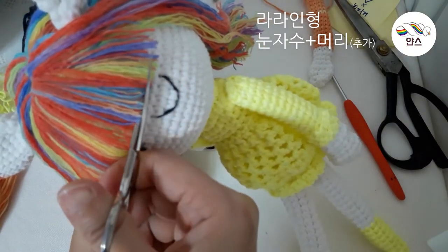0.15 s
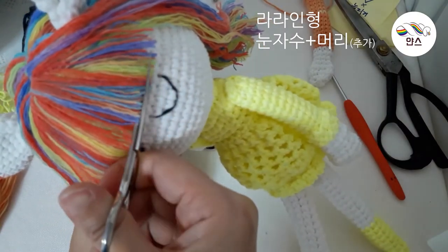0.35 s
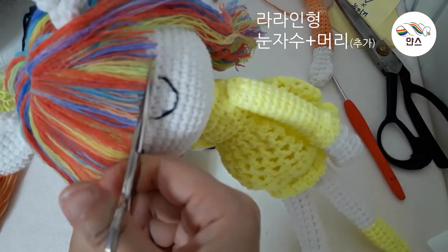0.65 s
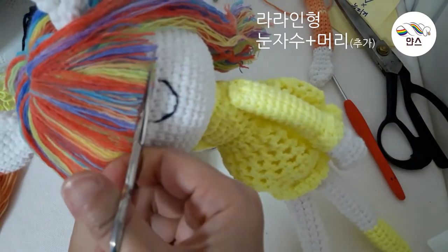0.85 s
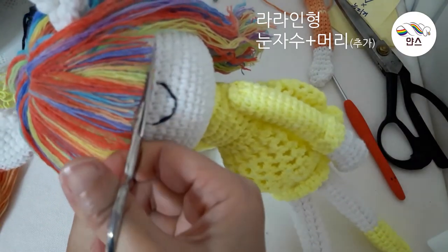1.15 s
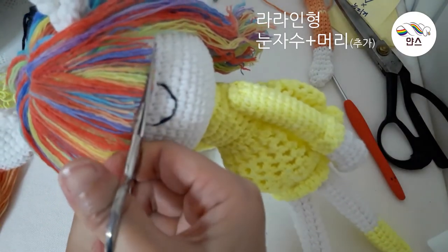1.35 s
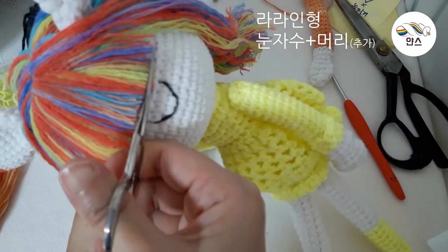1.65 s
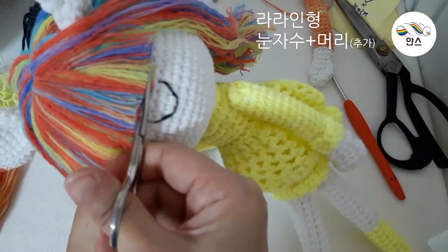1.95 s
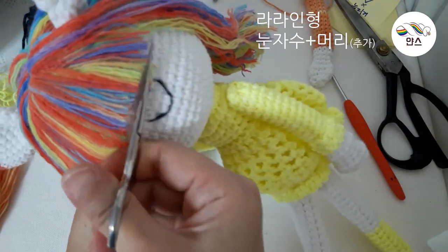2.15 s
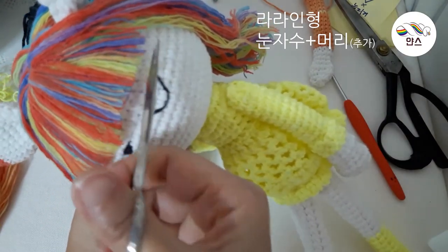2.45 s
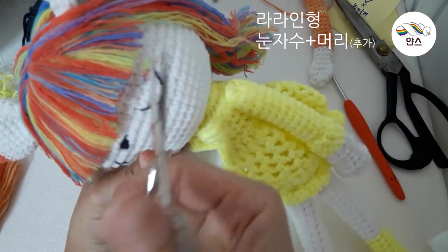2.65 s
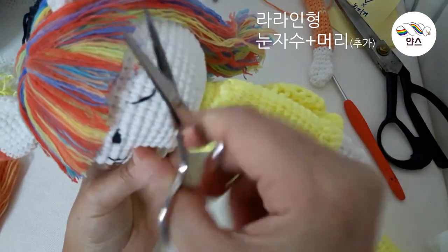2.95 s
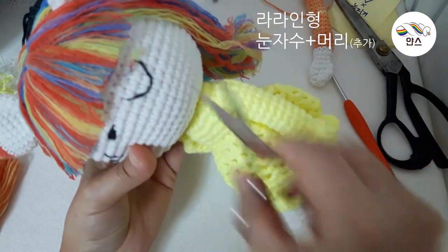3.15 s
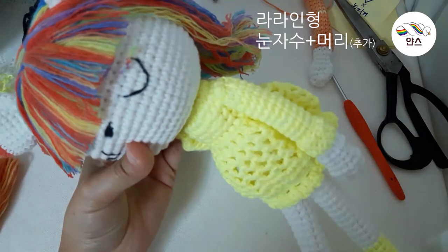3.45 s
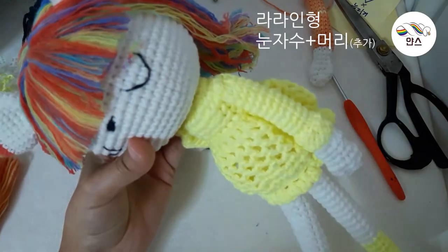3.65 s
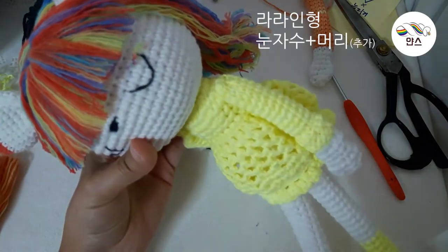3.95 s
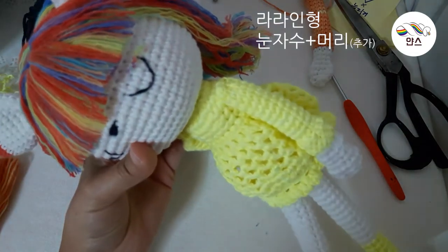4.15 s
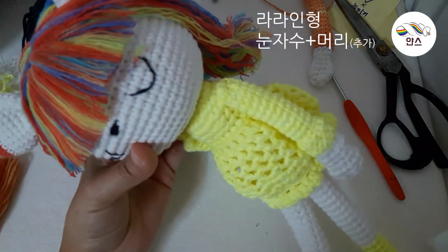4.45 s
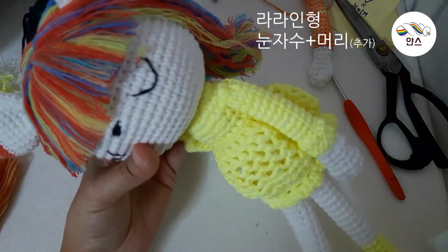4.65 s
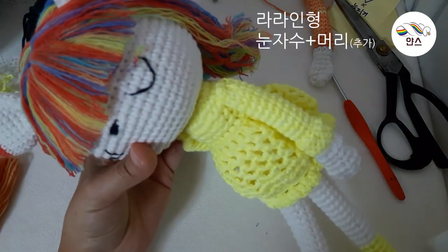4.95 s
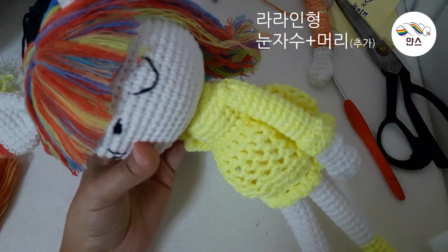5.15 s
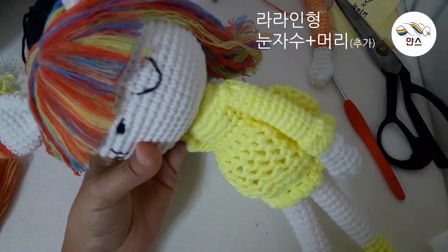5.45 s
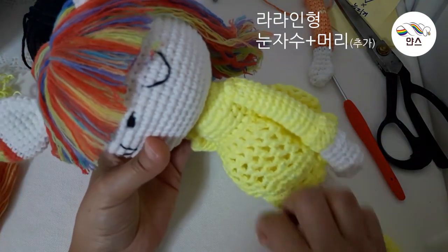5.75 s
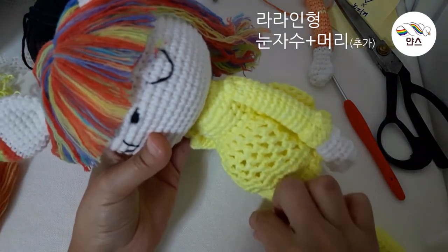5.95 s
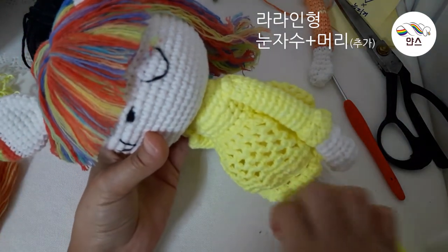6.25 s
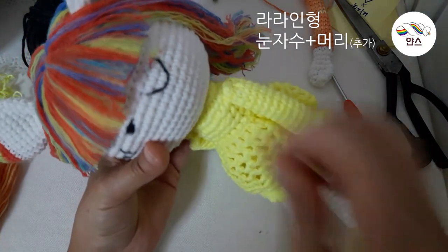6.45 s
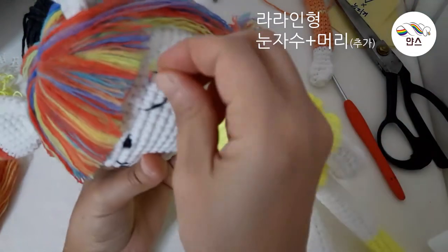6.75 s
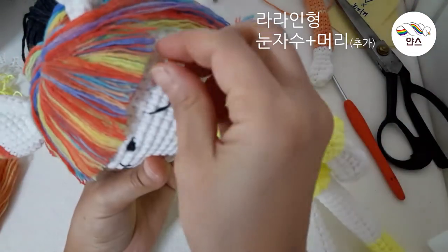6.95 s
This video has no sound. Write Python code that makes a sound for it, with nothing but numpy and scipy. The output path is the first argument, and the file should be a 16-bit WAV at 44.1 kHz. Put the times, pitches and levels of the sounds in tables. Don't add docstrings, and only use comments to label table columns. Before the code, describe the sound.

Close phone microphone, indoors. Fibres snap in a swelling, gritty cut, then a quick second cut ends with a tiny steel snap. After near silence, the blades click, touch the table with a small jingle and thud, then fall with a sharp bright clack and bounce. Hands brush knitted wool and gently knock the table over soft hiss and traffic rumble.

```python
import sys
import numpy as np
from scipy import signal
from scipy.fft import rfft, irfft
from scipy.io import wavfile
from scipy.ndimage import uniform_filter1d

SR = 44100
rng = np.random.default_rng(int(sys.argv[2]) if len(sys.argv) > 2 else 0)


def generate_wav(signal):
    frames = np.transpose(np.atleast_2d(signal))
    scaled = np.clip(frames, -1, 1) * 32767
    pcm = np.round(scaled).astype(np.int16)
    wavfile.write(sys.argv[1], SR, pcm)


def voltage_ratio(decibels):
    exponent = np.asarray(decibels, float) / 20
    return 10 ** exponent


N = 313551
STEADY_TOP_HZ = 15880

# frequency in Hz, density in dB per Hz.
AIR_COLOUR = [(35, -43), (60, -7), (107, 0.5), (129, -2.5), (160, -2), (192, -6), (226, -10.5),
              (466, -14.5), (500, -14.5), (631, -15.5), (1530, -20.5), (1680, -20), (8180, -38.5),
              (12200, -32), (15700, -30.5)]
# frequency in Hz, side minus mid in dB.
PORT_SIDE_DB = [(60, -25), (110, -31), (200, -15), (380, -9.5), (700, -7.5), (1290, -5.5), (2380, -5),
                (4400, -2.5), (8120, -2.5), (15000, -3.5)]
# loudest time in seconds, level in dB.
RUMBLE_SWELLS = [(.01, -58), (.65, -65.5), (.92, -65.5), (1.3, -76), (1.62, -66), (2.199, -63.5),
                 (2.75, -65), (4.19, -68.5), (4.6, -72.5), (5.0, -69), (6.0, -71), (7.0, -65)]
# loudest time in seconds, level in dB, rise and fall in seconds over 20 dB.
DRONE_SWELLS = [(.3, -76, 2.5, 3.8), (2.7, -60.5, 0.43, 0.44), (3.25, -68, 0.4, 0.94),
                (6.3, -65.5, 2.2, 1.3)]
# centre in Hz, width in Hz.
RUMBLE_BAND_HZ = (45.6, 18)
DRONE_BAND_HZ = (66, 20)

# centre in seconds, level in dB, width in seconds.
STRAND_BREAKS = [
    [(.099, -68, .004), (.1156, -68, 0.0094), (.15, -83, 0.011), (.1643, -81, .012), (.1762, -74, .014),
     (.192, -65, .0085), (.1991, -68, 0.006), (.2084, -65, .004), (.221, -66, .013), (.248, -61.5, 0.0076),
     (.2744, -57, 0.0021), (.29, -64, 0.0074), (.31, -55, 0.0077), (.3237, -57, 0.0026),
     (.3456, -56, 0.008), (.3611, -53, 0.0076), (.3708, -56, 0.0053), (.3805, -53.5, 0.0092),
     (.392, -70, .005), (.401, -71, 0.0046), (.414, -47.5, 0.01), (.4258, -63, 0.0096)],
    [(1.782, -61, .007), (1.79, -63, 0.0057), (1.772, -64, .002), (1.806, -58, .004), (1.811, -61, .007),
     (1.8205, -61, 0.004), (1.825, -63, .004), (1.831, -64, .005), (1.8594, -48.5, 0.012),
     (1.878, -59, .006), (1.8832, -48, .006), (1.888, -53, 0.0057), (1.8925, -54, .005),
     (1.899, -68, 0.0037)],
    [(2.1315, -59, 0.0025), (2.1376, -73, 0.0072), (2.149, -66.5, 0.035)],
]
TIPS_CUT_S = [.215, 1.84, 2.2]
# time in seconds, level in dB.
BLADE_SLIDE = [
    [(.02, -81), (.08, -75), (.15, -71), (.17, -64.5), (.24, -65), (.3, -66.5), (.39, -73), (.4, -95),
     (.43, -67), (.447, -78)],
    [(1.75, -77), (1.78, -72), (1.835, -64), (1.845, -75), (1.87, -66), (1.895, -62), (1.908, -77)],
]
# frequency in Hz, width in Hz, level in dB.
BLADE_BANDS = [(1360, 230, 0), (1770, 360, 7.5), (2570, 270, 6), (3650, 550, -20), (4660, 760, 6.5),
               (5940, 830, 0.5), (7460, 640, 7.5), (9630, 680, 7), (12500, 900, 1)]
# frequency in Hz, density in dB per Hz.
FIBRE_COLOUR = [(410, -51), (700, -37), (1600, -1.5), (2460, 10.5), (2880, -20), (3610, 4), (9850, -12.5),
                (11100, -4.5), (15200, -2), (16500, -44)]

# time in seconds, level in dB, T60 in seconds.
STEEL_ON_STEEL_TICKS = [(.452, -40, 0.014), (3.7634, -39, .012), (4.5095, -39.5, 0.044), (4.525, -45, .02),
                        (4.61, -56.5, .03), (4.925, -63, .01), (5.197, -55.5, .014), (5.262, -60, 0.011),
                        (5.302, -43.5, 0.022), (5.323, -48, 0.027), (5.404, -30.5, 0.046),
                        (5.409, -34, .05), (5.4988, -45, .02), (5.503, -48, .025), (5.508, -52, .03)]
HANDLE_TICKS = [(1.9137, -45, .01), (5.3802, -34.5, 0.055), (4.5072, -45, .004), (4.512, -46, .02),
                (4.5216, -41, 0.013), (4.525, -40, 0.02), (4.563, -52, .025), (4.611, -53, 0.033),
                (4.617, -55, .015), (4.847, -55, 0.0062), (4.86, -60, .015), (4.932, -58, .01),
                (4.979, -61, .02), (5.125, -63, .01), (5.197, -58, 0.013), (5.2656, -55, 0.0095),
                (5.957, -55, .02)]
BLADE_TIP_TICKS = [(3.743, -59, 0.012), (3.762, -46, 0.0067), (4.511, -46, 0.035), (4.5215, -52, .015),
                   (4.525, -44, .03), (4.534, -51, .015), (4.5385, -48, .02), (4.611, -52, .03),
                   (5.308, -57, .03), (5.3803, -25, 0.028), (5.3825, -34, .04)]
PIVOT_TICKS = [(1.853, -49, .04), (1.858, -50, 0.037), (1.882, -55, 0.043), (0.56, -61, 0.03),
               (.5655, -53, .03), (.582, -63, .05)]
LATCH_TICKS = [(.0803, -68, .02), (.0962, -63, .03), (.108, -67, .04), (.1341, -65, .02), (.1576, -62, .04),
               (.172, -61, .04), (.1885, -57, .03), (.392, -66, .04), (3.763, -55, .06), (3.777, -57, .03),
               (3.782, -61, .02), (3.787, -62, .03), (4.924, -64, .02), (4.942, -63, .02)]
NAIL_TICKS = [(4.511, -48.5, 0.04), (5.3793, -41.5, 0.059), (5.795, -54, 0.024), (6.022, -61, 0.022),
              (6.0483, -50, 0.019)]
KNUCKLE_TICKS = [(4.511, -49.5, 0.041), (4.525, -46, 0.093), (5.379, -56, .04), (6.048, -49, 0.08)]
FLAT_SIDE_TICKS = [(5.957, -57.5, .02), (5.5, -60, 0.024), (5.377, -37, 0.045), (5.408, -44, 0.068),
                   (4.511, -50, .03), (4.5255, -48, .04), (6.0485, -46, .025)]
FIBRE_TICKS = [(.3605, -55, .015), (.378, -46, .025), (.409, -52, .04), (1.856, -58, .03),
               (1.879, -56, .04)]
RIVET_TICKS = [(4.9245, -58, .008), (4.9555, -45, .01), (4.617, -54, .02), (1.8065, -56, .012),
               (5.197, -55, .01), (.412, -52, .03), (.3095, -56, .015), (5.41, -42, .08)]
FINGER_LOOP_TICKS = [(5.3769, -22, .02), (5.3793, -22, .03), (5.4045, -38, .06), (5.42, -48, .2),
                     (4.511, -54, .03)]
# frequency in Hz, width in Hz.
TICK_BANDS = [(7486, 20000), (3260, 2600), (12120, 2300), (1770, 280), (7500, 850), (1186, 400), (356, 260),
              (680, 720), (14580, 2600), (4060, 2000), (6500, 2400)]
SNAP_TIMES_S = [
    1.9136,
    3.7621,
    5.3768,
]
# peak in dB, T60 in seconds, first click over the rattle in dB.
SNAP_SHAPES = [(-32, 0.006, 17), (-33, 0.013, 12), (-11.5, 0.022, 9.07)]
# frequency in Hz, density in dB per Hz.
SNAP_SPECTRA = [
    [(290, -46), (600, -22), (900, -17), (1700, -14), (2650, 5), (3500, -10), (4700, 2.5), (6000, -14), (7400, -3.5), (9700, -19), (13100, -5), (16800, -27)],
    [(290, -55), (500, -32), (1300, -29), (2600, -7.5), (4000, -13), (5270, -29), (6600, -26), (7600, 0), (7950, 3), (8900, -7), (10200, -3), (12000, -16), (13700, -4), (15900, -8), (16800, -38.5)],
    [(180, -41.5), (550, -20.5), (1250, -20.5), (1950, -22.5), (2400, -8.5), (3280, -16.5), (4230, -18.5), (6550, -4.5), (7890, -10), (8300, -29), (9030, -16), (13800, -1.5), (16800, -31)],
]

# loudest time in seconds, level in dB, rise and fall in seconds over 20 dB.
BRUSH_STROKES = [(.564, -73, 0.033, 0.41), (.865, -76, .02, .15), (3.09, -76.5, 0.17, .02),
                 (3.904, -65, 0.03, 0.057), (4.105, -61, 0.016, 0.088), (4.15, -76.5, 0.075, 0.047),
                 (4.3, -73, 0.54, 0.48), (4.86, -61.5, 0.01, 0.095), (4.94, -68, 0.051, 0.023),
                 (4.985, -69.5, 0.047, 0.013), (5.16, -71.5, 0.33, 0.11), (5.28, -66.5, 0.11, 0.064),
                 (5.435, -58.5, 0.011, 0.013), (5.45, -68, .04, .05), (5.485, -70, 0.076, 0.016),
                 (5.798, -70, 0.027, 0.28), (5.958, -71.5, 0.018, 0.36), (6.1, -77, 0.29, 0.053),
                 (6.31, -73.5, 0.099, 0.24), (6.91, -71.5, 0.22, 0.014), (6.966, -76, 0.022, .06)]
# frequency in Hz, density in dB per Hz.
WOOL_COLOUR = [(710, -24.5), (1200, -2), (1870, -8), (3840, -2), (5610, -12.5), (7310, -7.5), (8570, -18.5),
               (15000, -13.5)]
# loudest time in seconds, level in dB, rise and fall in seconds over 20 dB.
DRAG_STROKES = [(6.255, -70, .1, 0.048), (6.3, -67, 0.047, 0.065), (6.372, -67, 0.072, 0.097)]
# frequency in Hz, width in Hz, level in dB.
DRAG_BANDS = [(480, 30, -1.5), (1120, 110, -8), (1690, 50, 0), (2273, 70, -4), (2830, 270, -9)]

# time in seconds, level in dB, free ringing in seconds,
# sharpening of all modes in percent, sharpening of the loose blade in Hz.
STEEL_TAPS = [
    (4.51, -44, .04, -0.032, 0),
    (4.5251, -41, .04, -0.028, 33),
    (4.5385, -40.5, 0.039, -0.072, 33),
    (4.6105, -43, 0.024, .22, 18),
    (5.307, -48.5, .018, -0.079, 44.5),
    (5.324, -52, 0.022, 0.16, 10.5),
    (5.378, -24.5, .042, -0.013, 4),
    (5.406, -34.5, .03, 0.074, 10.5),
]
MODE_DB = [(-10, -3, -9.5, -15.5, -21.5, -5.5, -25, -25), (-16, -14, -15, -18.5, -21, -13, -23, -22),
           (-21, -7.5, -7, -20, -4, -11, -17.5, -19.5), (-19, -2.5, -9.5, -14.5, -19, -7, -19.5, -17.5),
           (-25, -35, -37, -44, -29, -39, -25.5, -33), (-32, -34, -36, -51, -28.5, -38.5, -20, -16.5),
           (-8, -6, -6.5, -17.5, -17, -13, -15, -10), (-21, -12, -9, -30, -22.5, -27.5, -26.5, -24),
           (-23, -21, -37, -33, -23, -19, -13.5, -16), (-21, -1, -4.5, -14, -6.5, -4.5, -13, -21.5),
           (-6, -4, -2, -20, -18.5, -9, -15, -4), (-13, -5, -13, -15, -30, -26, -23.5, -13.5),
           (-23, -23, -30, -40, -37, -25.5, -11, -10.5), (-26, -24, -40, -36, -26.5, -23.5, -11, -7),
           (-18, -28, -35, -28, -23, -32.5, -18, -12), (-25, -25, -30, -35, -30, -30, -17, -20),
           (-13, -7, -3, -9, -24.5, 0, -2, -7.5), (-5, 1, 1, 0, -8.5, -17, -9, 0.5),
           (-13, -6, -10.5, -9, -3.5, -2, -10, -13.5), (-24, -20, -22, -17, -23.5, -36.5, -19, -14),
           (0, -2.5, -3, -13, -10.5, -13.5, -11, 0), (-14, -9, -8, -18, -19, -13.5, -16.5, -13),
           (-21, -11, -7.5, -25, -5, -7, -19.5, -18.5), (-22, -34, -32, -34, -31, -20.5, -25.5, -20.5)]
MODE_HZ = [1707, 3429, 5890, 6670, 7170, 7424, 8445, 9213, 9585, 9755, 10417, 10540, 11897, 11970, 12350,
           13030, 13425, 13496, 13528, 13760, 14125, 14301, 14525, 15130]
MODE_T60_S = [.07, .14, .12, .13, .06, .048, .17, .1, .08, .3, .11, .12, .07, .1, .06, .08, .09, .14, .1,
              .12, .12, .13, .12, .3]
LOOSE_MODE_HZ = [6670, 8445]
TIP_REST_DB = [-5, -5, -19, -5.5, -5, -13.5, -8, -13]
HAND_STOPS_S = [4.74, 5.503]

# time in seconds, peak in dB, upper modes in dB, push in seconds, free ringing in seconds.
TABLE_BUMPS = [(4.526, -42.5, -8, 0.0015, 0.044), (4.559, -46.5, -3, 0.0053, 0.08),
               (4.849, -40.5, -9.5, 0.011, 0.032), (5.378, -35.5, -7, 0.0025, 0.045),
               (5.41, -48, 0, 0.0055, 0.1), (5.958, -51, 1.5, 0.0065, 0.075),
               (5.986, -55.5, 10, 0.0081, 0.042), (6.012, -51.5, 8, 0.0045, 0.028),
               (6.0486, -53.5, 8.5, 0.00096, 0.034), (6.066, -53.5, 2.5, 0.003, 0.038),
               (6.118, -67.5, 10, 0.0031, 0.026)]
# frequency in Hz, level in dB, T60 in seconds.
TABLE_LOW_MODES = [(68.4, -18.5, 0.15), (106.7, -1, 0.48)]
TABLE_UPPER_MODES = [(164, 8, 0.081), (198.4, -3.5, 0.21), (271, 2, 0.056), (460, -7.5, 0.0355)]

# frequency in Hz, level in dB.
ECHO_COLOUR = [(300, 0.5), (1200, 0.5), (3500, -5), (7000, 0), (10000, -3.5), (14000, -7)]


def level(x, db):
    return x * voltage_ratio(db) / np.sqrt(np.mean(x ** 2))


def peak(x, db):
    return x * voltage_ratio(db) / np.abs(x).max()


def colour(x, points):
    hz, db = np.transpose(points)
    f = np.fft.rfftfreq(len(x), 1 / SR) + 1
    return irfft(rfft(x) * voltage_ratio(np.interp(np.log(f), np.log(hz), db)), len(x))


def strike(x, points):
    hz, db = np.transpose(points)
    f = np.fft.rfftfreq(1024, 1 / SR) + 1
    cepstrum = irfft(np.log(voltage_ratio(np.interp(np.log(f), np.log(hz), db))))
    folded = np.r_[cepstrum[0], 2 * cepstrum[1:512], np.zeros(512)]
    impulse = irfft(np.exp(rfft(folded)))
    return signal.fftconvolve(x, impulse)[:len(x)]


def band(x, hz, width_hz):
    return signal.lfilter(*signal.iirpeak(min(hz, SR / 2.2), hz / abs(width_hz), fs=SR), x)


def low_pass(x, hz):
    return irfft(rfft(x) * (np.fft.rfftfreq(N, 1 / SR) < hz), N)


def add(out, start_s, x):
    i = int(start_s * SR)
    out[i:i + len(x)] += x[:N - i]


def gain(spans, edge_s=0.013):
    t, g = np.arange(N) / SR, np.zeros(N)
    for rows in spans:
        s, db = np.transpose(rows)
        edges = np.clip(np.minimum(t - s[0], s[-1] - t) / edge_s, 0, 1)
        g += voltage_ratio(np.interp(t, s, db)) * edges
    return g


def swells(rows):
    t, g = np.arange(N) / SR, np.zeros(N)
    for top_s, db, rise_s, fall_s in rows:
        away = np.maximum((top_s - t) / rise_s, (t - top_s) / fall_s)
        g += voltage_ratio(db - 20 * away.clip(0, 9))
    return g


def flicker(rate_hz, db):
    k = int(SR / rate_hz)
    steps = np.repeat(rng.standard_normal(N // 20), k)[:N]
    return voltage_ratio(db * uniform_filter1d(steps, k))


def crackle(spread_db):
    return rng.standard_normal(N) * voltage_ratio(spread_db * rng.exponential(size=N).clip(0, 4))


def damped(t, free_s, t60_s, rest_db):
    return voltage_ratio(-60 * np.maximum(t - free_s, 0) / t60_s).clip(voltage_ratio(rest_db))


def ring(modes, lift_db, t, fall, phase):
    hz, db, t60_s = np.transpose(modes)[:, :, None]
    sines = np.sin(2 * np.pi * (hz * t + phase))
    return np.sum(voltage_ratio(db + lift_db - 60 * t / t60_s) * sines * fall, axis=0)


def air():
    mid, other = (level(colour(rng.standard_normal(N), AIR_COLOUR), -63.5) for _ in range(2))
    above = signal.sosfilt(signal.butter(6, 88, "high", fs=SR, output="sos"), mid)
    deep = rng.standard_normal(N)
    bands = RUMBLE_BAND_HZ, DRONE_BAND_HZ
    rumble, drone = (level(band(band(deep, *hz), *hz), 0) for hz in bands)
    rise_s, fall_s, bed_db = .25, .3, -75.5
    traffic = voltage_ratio(bed_db) + swells((s, db, rise_s, fall_s) for s, db in RUMBLE_SWELLS)
    side = voltage_ratio(-2.0) * colour(other, PORT_SIDE_DB)
    return above + rumble * traffic + drone * swells(DRONE_SWELLS), side


def snips():
    throat_treble_db, tip_treble_db = -18, -1
    snaps = crackle(3.5)
    body = sum(voltage_ratio(db) * band(snaps, hz, width) / np.sqrt(width) for hz, width, db in BLADE_BANDS)
    tone = level(colour(snaps, FIBRE_COLOUR), -0.89) + level(body, -6.0)
    low = signal.sosfilt(signal.butter(2, 8600, fs=SR, output="sos"), tone)
    dull, bright = np.zeros(N), np.zeros(N)
    for cut, tips_s in zip(STRAND_BREAKS, TIPS_CUT_S):
        for centre_s, db, width_s in cut:
            swell = np.hanning(int(1.53 * width_s * SR) + 9) * voltage_ratio(db)
            start_s = centre_s - len(swell) / SR / 2
            treble_db = tip_treble_db if centre_s > tips_s else throat_treble_db
            add(dull, start_s, swell)
            add(bright, start_s, swell * voltage_ratio(treble_db))
    slide = level(level(body, 0) + level(low, -1.9), 0) * gain(BLADE_SLIDE) * flicker(150, 3.9)
    return level(low, 0.2) * dull + level(tone - low, 0.93) * bright + slide


def ticks():
    out, t = np.zeros(N), np.arange(SR // 5) / SR
    touched = [STEEL_ON_STEEL_TICKS, HANDLE_TICKS, BLADE_TIP_TICKS, PIVOT_TICKS, LATCH_TICKS, NAIL_TICKS,
               KNUCKLE_TICKS, FLAT_SIDE_TICKS, FIBRE_TICKS, RIVET_TICKS, FINGER_LOOP_TICKS]
    first_click = 4.5
    for rows, (hz, width_hz) in zip(touched, TICK_BANDS):
        for s, db, t60_s in rows:
            noise = rng.standard_normal(len(t) - 1)
            rattle = np.r_[first_click, noise] * voltage_ratio(-60 * t / t60_s)
            add(out, s, peak(band(band(rattle, hz, width_hz), hz, width_hz), db + 3.0))
    out = low_pass(out, STEADY_TOP_HZ)
    for s, (db, t60_s, click_db), points in zip(SNAP_TIMES_S, SNAP_SHAPES, SNAP_SPECTRA):
        noise = rng.standard_normal(len(t) - 1)
        rattle = np.r_[voltage_ratio(click_db), noise] * voltage_ratio(-60 * t / t60_s)
        add(out, s, peak(strike(rattle, points), db))
    return out


def hands():
    brush = level(colour(crackle(2.0), WOOL_COLOUR), -0.44) * swells(BRUSH_STROKES) * flicker(60, 2.6)
    slips, scrape = crackle(3.7), np.zeros(N)
    for hz, width_hz, db in DRAG_BANDS:
        narrowed = band(band(slips, hz, 2.1 * width_hz), hz, 1.8 * width_hz)
        scrape += voltage_ratio(db) * level(narrowed, 0)
    return brush + level(scrape, 0) * swells(DRAG_STROKES) * flicker(50, 4)


def steel():
    held_t60_s, held_rest_db, struck_t60_s = .05, -26, .012
    tip_t60_s = .145
    waver_hz, waver_db = 13, 2.5
    out, t = np.zeros(N), np.arange(SR // 4) / SR
    t60_s = np.array(MODE_T60_S)
    stops = np.sort([row[0] for row in STEEL_TAPS] + list(HAND_STOPS_S))
    count = len(MODE_HZ)
    for tap, mode_db, tip_db in zip(STEEL_TAPS, np.transpose(MODE_DB), TIP_REST_DB):
        s, db, free_s, sharper_pct, loose_hz = tap
        hz = np.array(MODE_HZ) * (1 + sharper_pct / 100) + loose_hz * np.isin(MODE_HZ, LOOSE_MODE_HZ)
        rest_db = np.where(t60_s[:, None] > tip_t60_s, tip_db, held_rest_db)
        fall = damped(t, free_s, held_t60_s, rest_db) * np.minimum(t / 0.00074, 1)
        next_stop = stops[np.searchsorted(stops, s, "right")]
        fall = fall * voltage_ratio(-60 * np.maximum(s + t - next_stop, 0) / struck_t60_s)
        steps = rng.standard_normal((2, count, 64))
        pitch, size = np.repeat(steps, len(t) // 64 + 1, axis=2)[:, :, :len(t)]
        lift_db = db + waver_db * uniform_filter1d(size, 150)
        phase = rng.random((count, 1)) + waver_hz * np.cumsum(pitch, axis=1) / SR
        add(out, s, ring(np.c_[hz, mode_db, t60_s], lift_db, t, fall, phase))
    return out


def table():
    out, t = np.zeros(N), np.arange(SR // 3) / SR
    modes = list(TABLE_LOW_MODES) + list(TABLE_UPPER_MODES)
    counts = [len(TABLE_LOW_MODES), len(TABLE_UPPER_MODES)]
    for s, db, upper_db, push_s, free_s in TABLE_BUMPS:
        lift_db = db + np.repeat([0, upper_db], counts)[:, None]
        fall = (1 - np.exp(-t / push_s)) * damped(t, free_s, 0.045, -42)
        add(out, s, ring(modes, lift_db, t, fall, 0))
    return out


def echo(x, tail):
    return signal.fftconvolve(x, tail / np.linalg.norm(tail))[:N]


def scene():
    room_t60_s, room_db, near_side_db = .26, -19.5, -54.5
    near = low_pass(snips() + hands() + steel() + table(), STEADY_TOP_HZ) + ticks()
    t = np.arange(SR // 3) / SR
    tail, scatter = rng.standard_normal((2, len(t)))
    tail = colour(tail, ECHO_COLOUR) * voltage_ratio(-60 * t / room_t60_s) * np.minimum(t / 0.0072, 1)
    near = near + voltage_ratio(room_db) * low_pass(echo(near, tail), STEADY_TOP_HZ)
    scatter = scatter * voltage_ratio(-60 * t / 0.055)
    near_side = voltage_ratio(near_side_db) * band(echo(near, scatter), 1300, 2512)
    mid, side = low_pass(air(), STEADY_TOP_HZ) + [near, near_side]
    return np.array([mid + side, mid - side])


def band_limit(x):
    return signal.sosfilt(signal.butter(12, 16990, fs=SR, output="sos"), x)


def record(dry):
    low_hz, top_hz = 39, 16800
    high_pass = signal.butter(8, low_hz, "high", fs=SR, output="sos")
    mix = signal.sosfilt(high_pass, low_pass(dry, top_hz))
    return band_limit(mix)


dry = scene()
out = record(dry)
generate_wav(out)
```